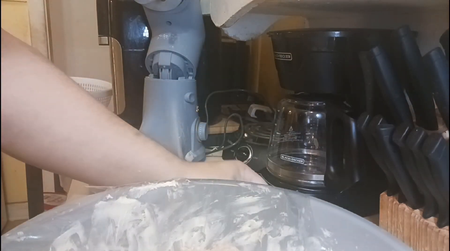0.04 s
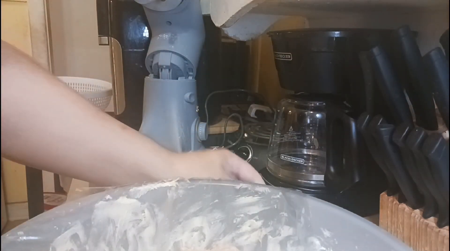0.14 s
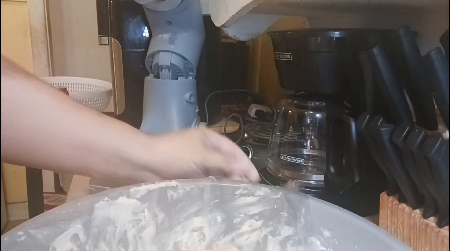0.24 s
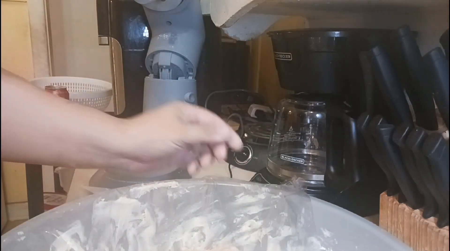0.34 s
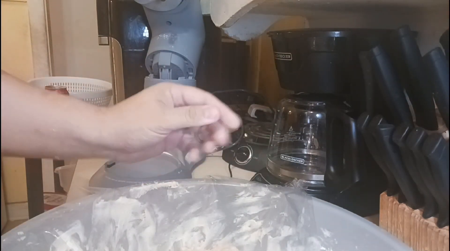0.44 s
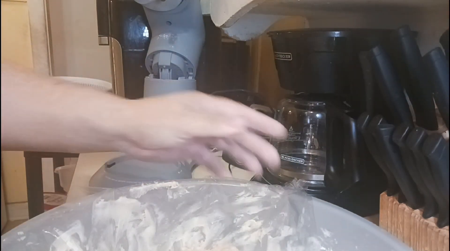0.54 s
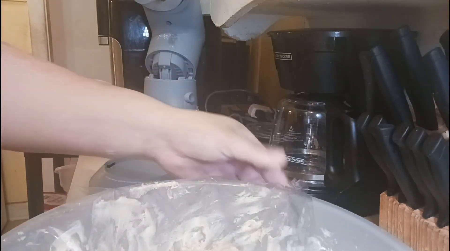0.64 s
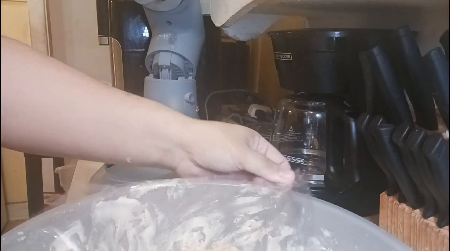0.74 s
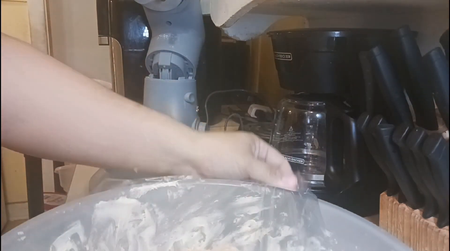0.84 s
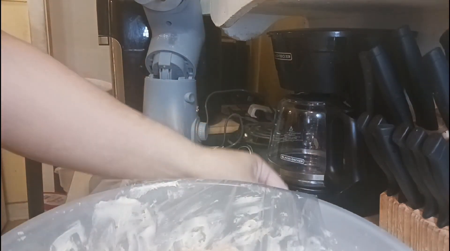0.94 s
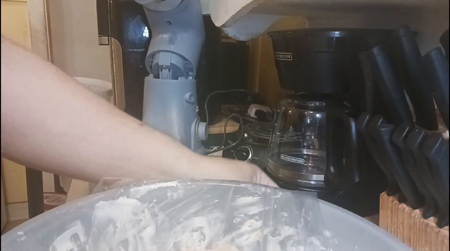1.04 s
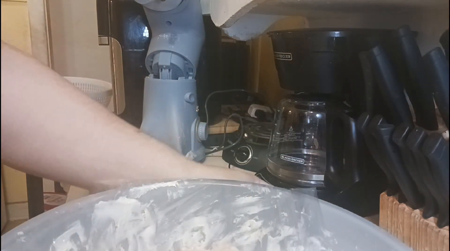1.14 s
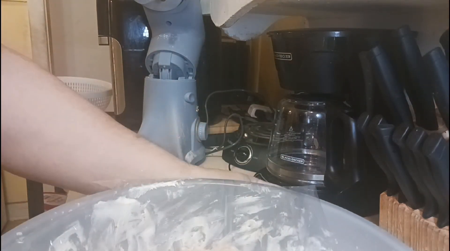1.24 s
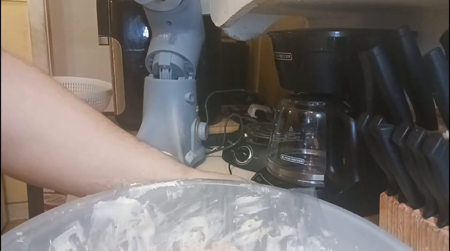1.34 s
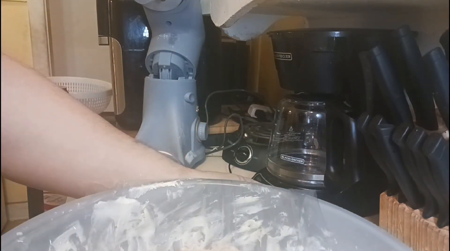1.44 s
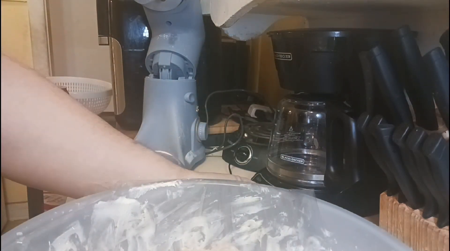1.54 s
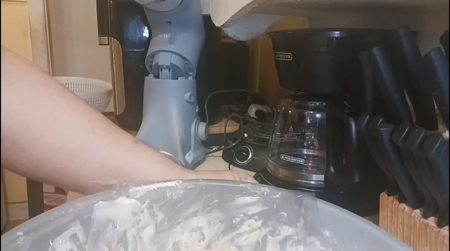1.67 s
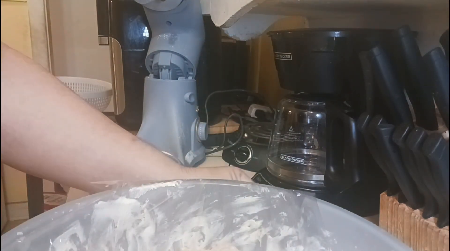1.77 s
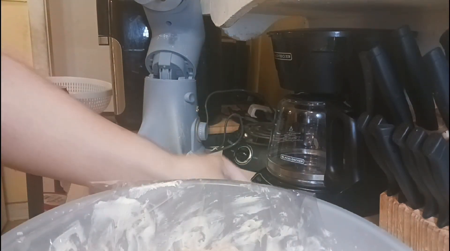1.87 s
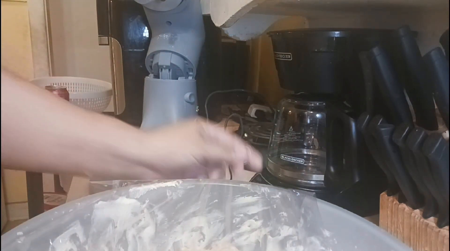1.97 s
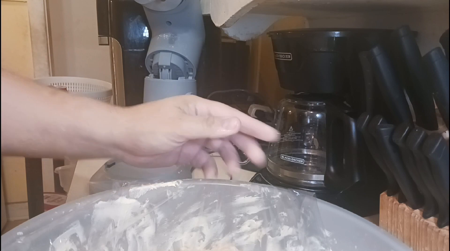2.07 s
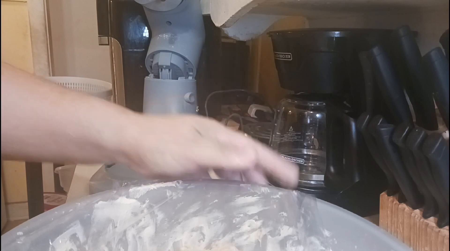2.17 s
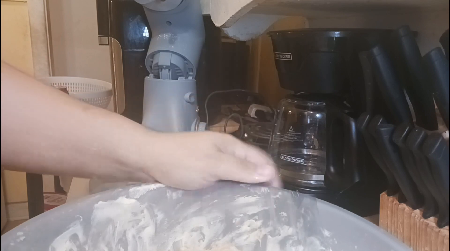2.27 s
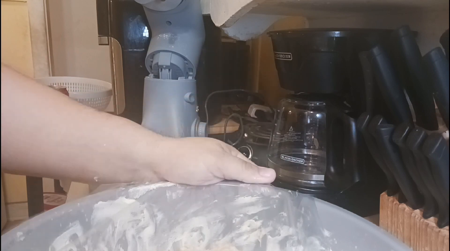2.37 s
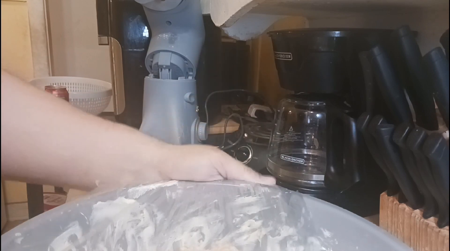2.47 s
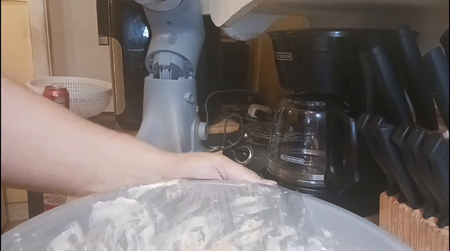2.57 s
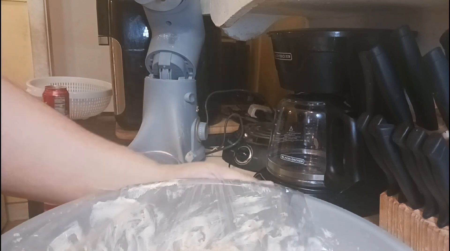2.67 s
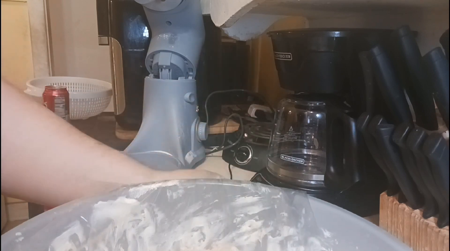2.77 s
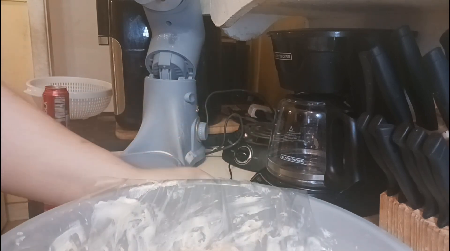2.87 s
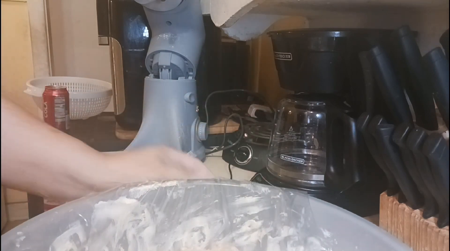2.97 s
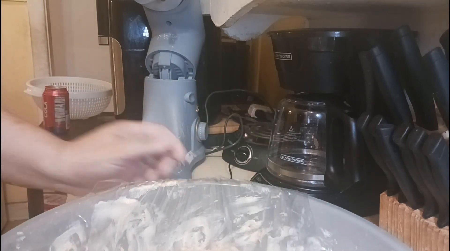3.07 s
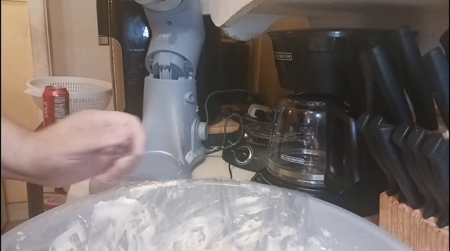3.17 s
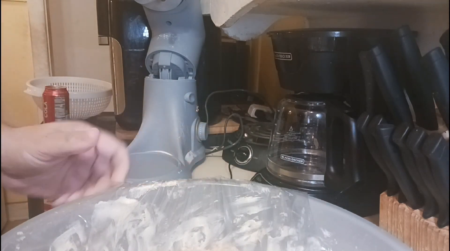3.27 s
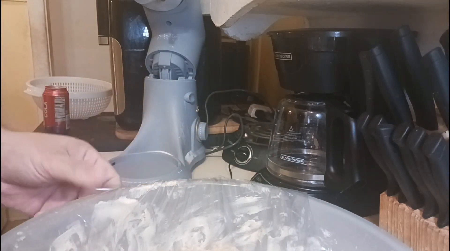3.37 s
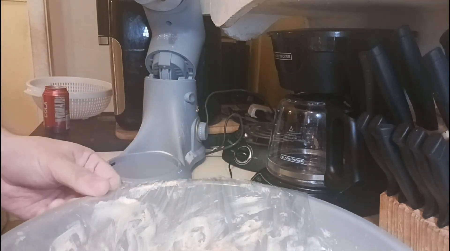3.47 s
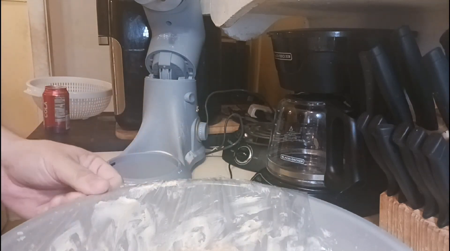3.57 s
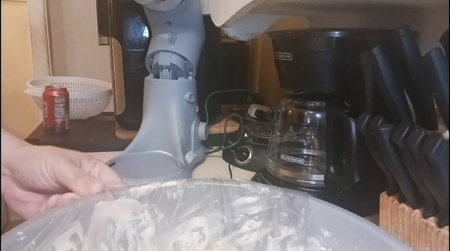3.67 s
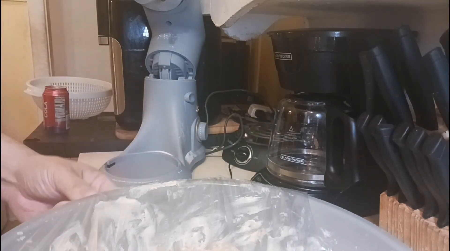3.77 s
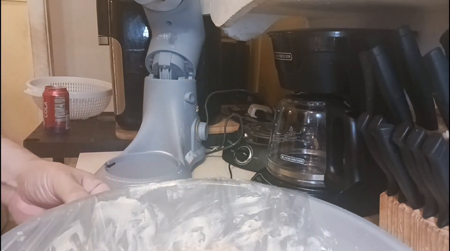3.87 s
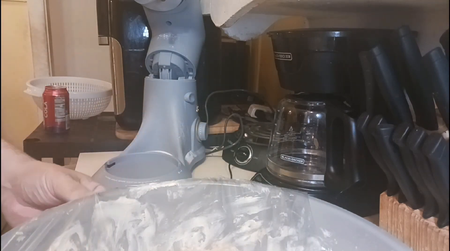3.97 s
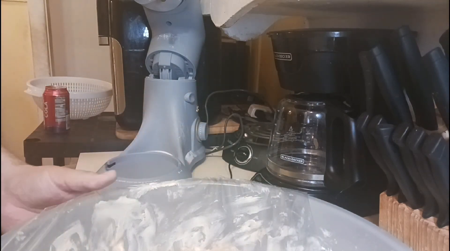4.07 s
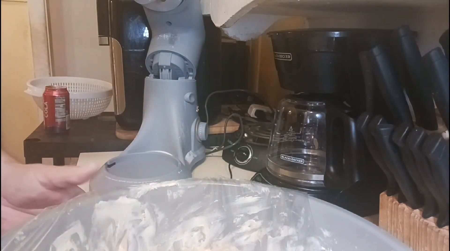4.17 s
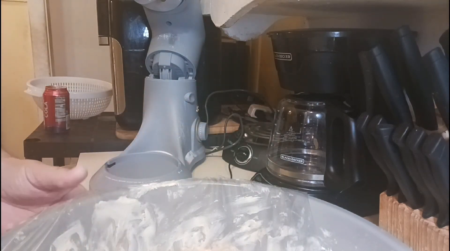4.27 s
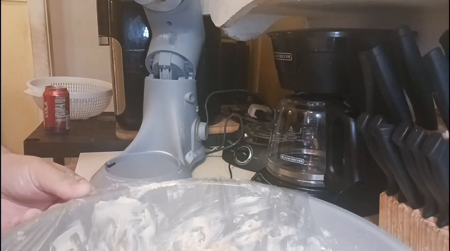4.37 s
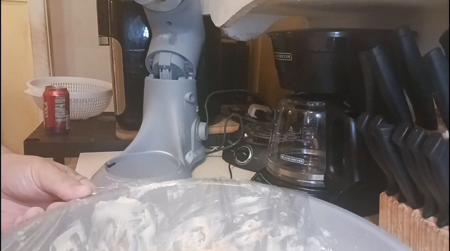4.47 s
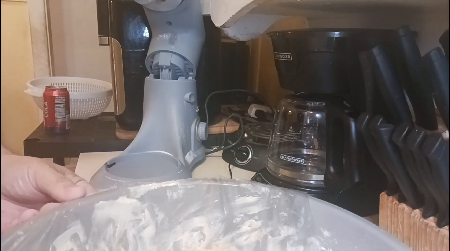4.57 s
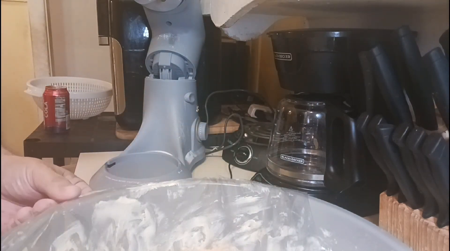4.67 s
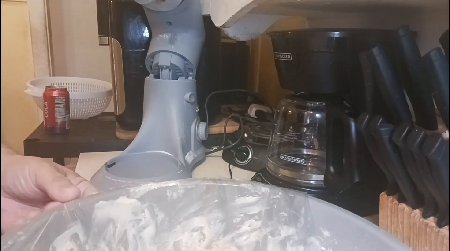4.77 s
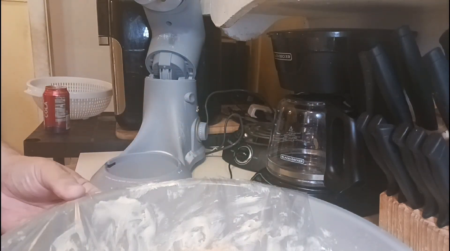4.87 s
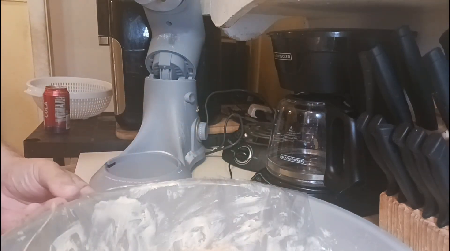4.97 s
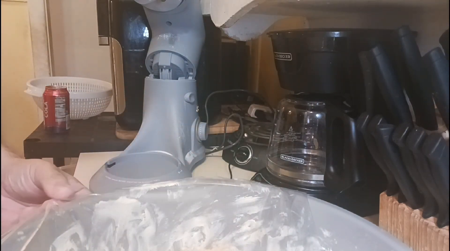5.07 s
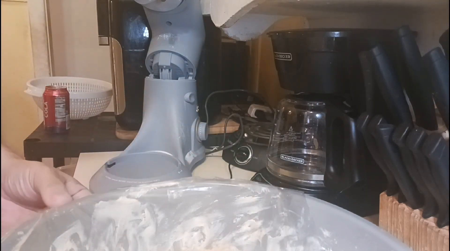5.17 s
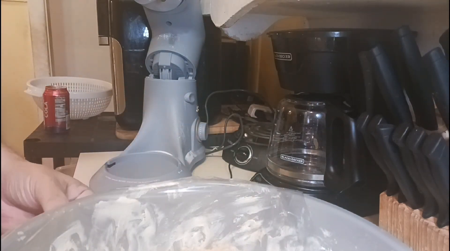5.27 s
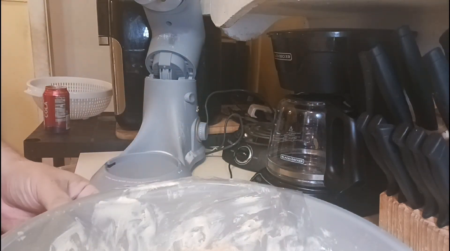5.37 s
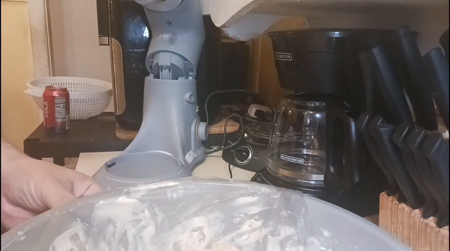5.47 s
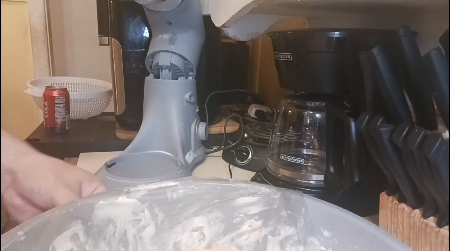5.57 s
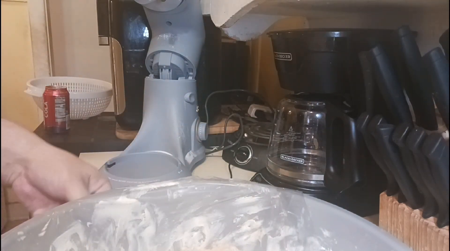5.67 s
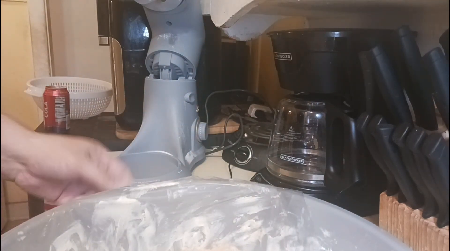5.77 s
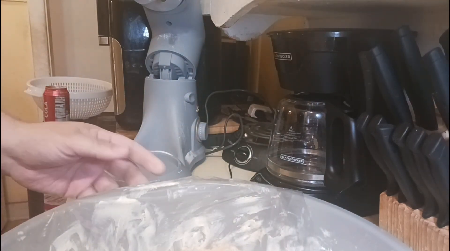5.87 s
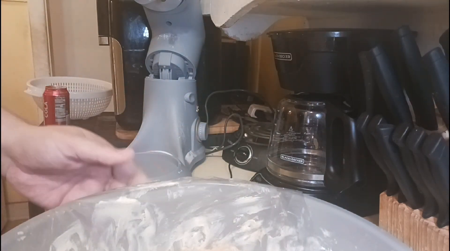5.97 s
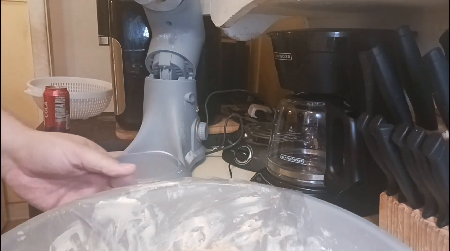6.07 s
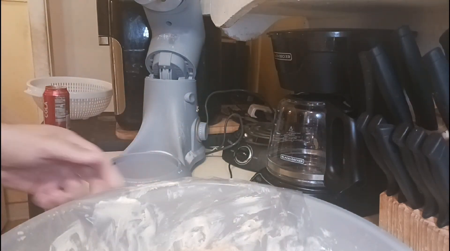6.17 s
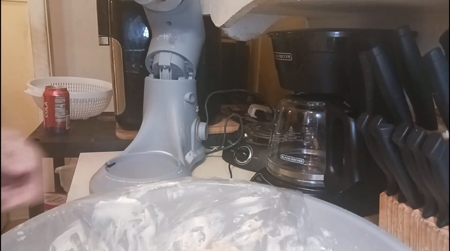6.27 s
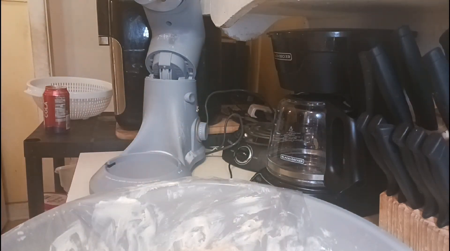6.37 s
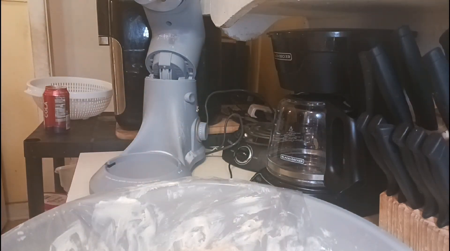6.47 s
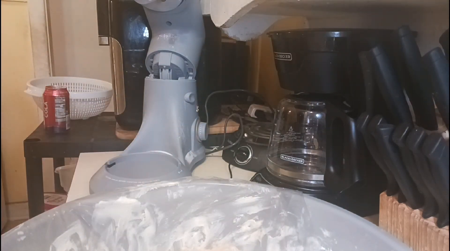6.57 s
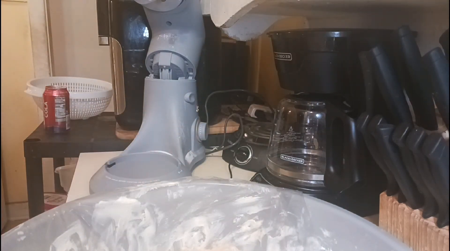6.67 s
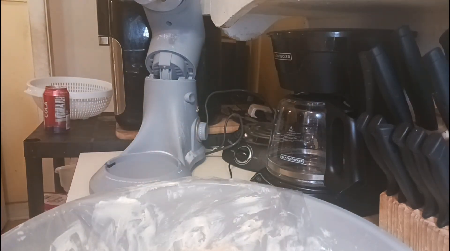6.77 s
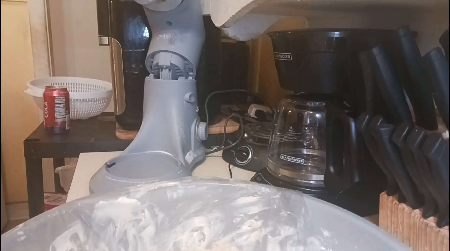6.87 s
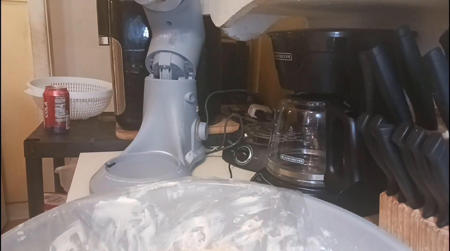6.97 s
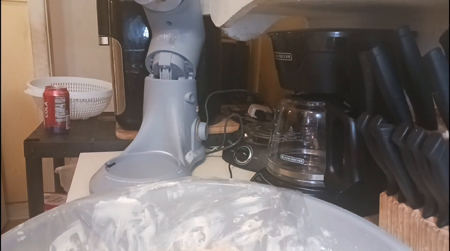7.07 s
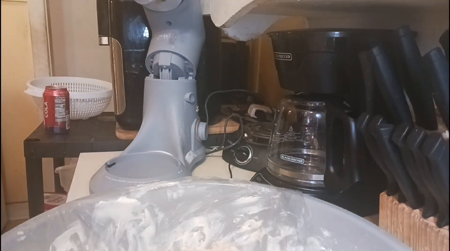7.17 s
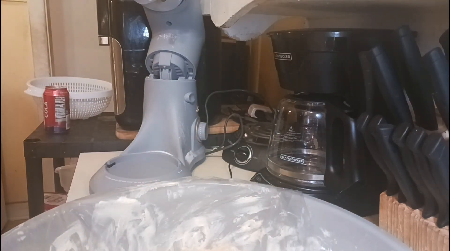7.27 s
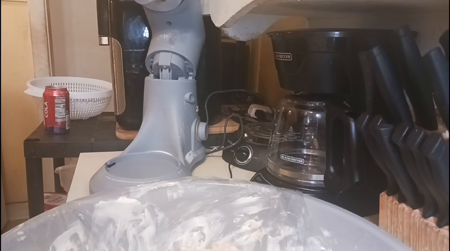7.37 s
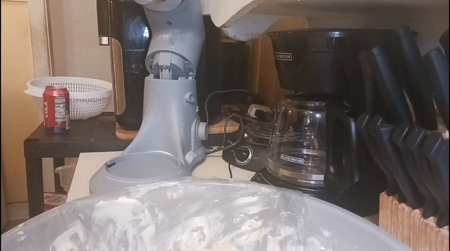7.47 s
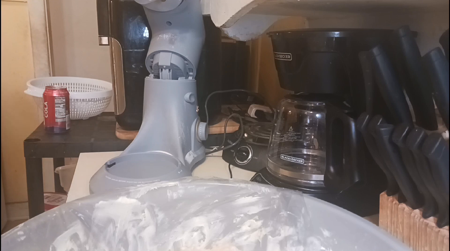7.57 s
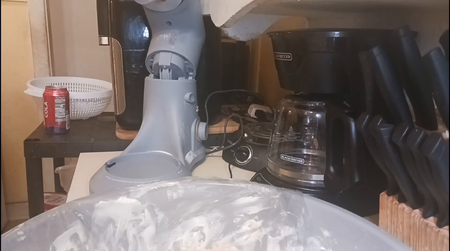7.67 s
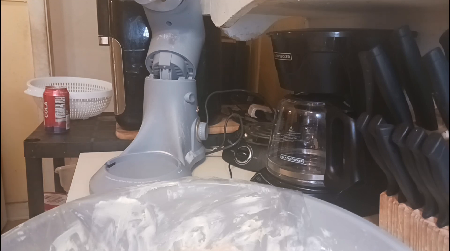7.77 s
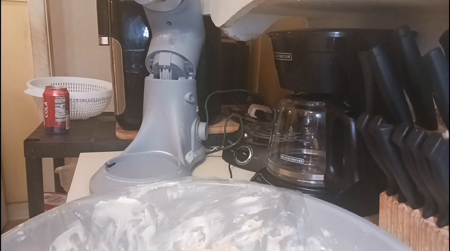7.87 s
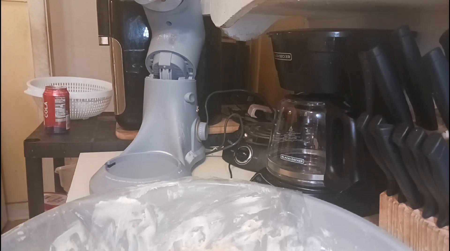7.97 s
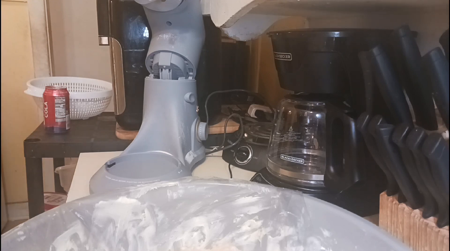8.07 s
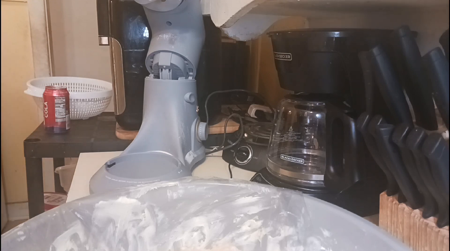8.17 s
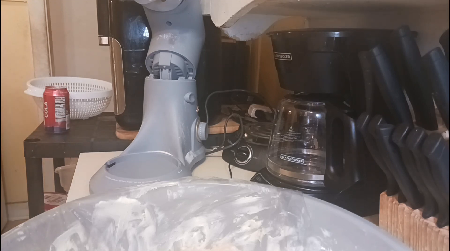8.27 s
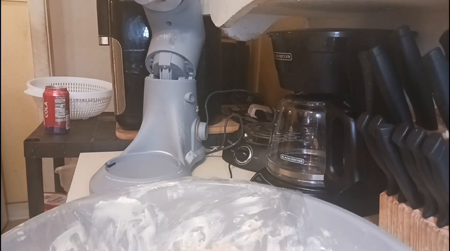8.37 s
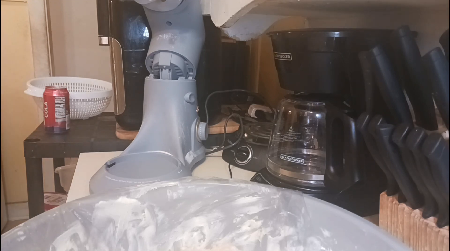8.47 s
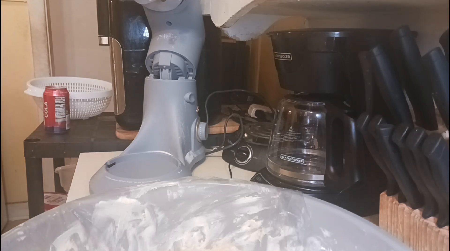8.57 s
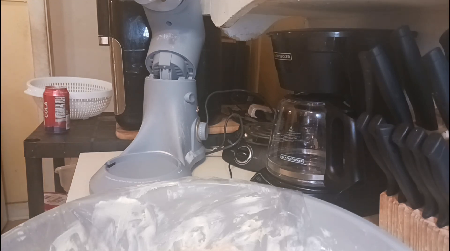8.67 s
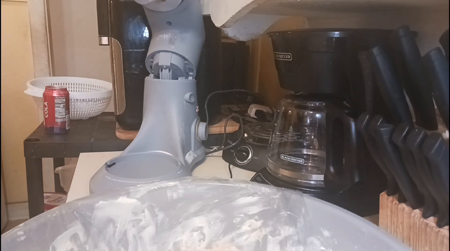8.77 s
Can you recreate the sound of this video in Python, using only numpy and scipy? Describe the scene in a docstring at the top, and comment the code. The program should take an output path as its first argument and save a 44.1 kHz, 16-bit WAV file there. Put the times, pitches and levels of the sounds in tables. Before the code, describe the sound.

A close stereo phone pickup in a small quiet kitchen, left side bright, right duller, with faint low appliance hum throughout. Plastic film rustles from the start; at 0.1-0.3 s a strong rubbery squeak drops in pitch, with snaps and a woody bump. Light crackle continues, swelling near 1 s. From 1.2 to 1.9 s several short squeaks and creaks slide up and down, with a knock at 1.3. After a brief lull, 2.3-3.1 s is dense: crisp crackles, chirps, snaps and bumps, loudest around 2.9. Then sparse ticks, a sharp crinkle at 3.55, tiny chirps at 4.1 and 4.95, creaky snaps near 5.45, a bright crackle and squeak at 5.7, and a last rising squeak at 6.2. From 6.3 to 8 s only faint rustles and soft bumps remain. Crackling returns at 8-8.3 s, ending in tight higher-pitched snaps and knocks at 8.6-8.8.

```python
"""Fingers press and stretch cling film over the rim of a mixing bowl in a quiet kitchen, close to a phone.
Appliances hum far off throughout (shaped noise) while the film rustles and creaks (clicks, short grains).
Squeaky strokes (a push per slip of the skin) start at once and recur until 6.2 s; from 0.24 s the bowl
bumps the counter (noise bursts) and folds snap (crackle over a ringing push), densely again after 8 s.
The left microphone port is bright, the right one dull."""
import sys
import numpy as np
from scipy import signal
from scipy.fft import rfft, irfft, next_fast_len
from scipy.io import wavfile
from scipy.ndimage import uniform_filter1d, map_coordinates

SR = 44100
rng = np.random.default_rng(int(sys.argv[2]) if len(sys.argv) > 2 else 0)


def generate_wav(signal):
    """Clip the signal to [-1, 1] and save it as 16-bit WAV at the path in sys.argv[1]."""
    frames = np.transpose(np.atleast_2d(signal))
    scaled = np.clip(frames, -1, 1) * 32767
    pcm = np.round(scaled).astype(np.int16)
    wavfile.write(sys.argv[1], SR, pcm)


N = 389403

# Spectra of fine and coarse crackle, relative: freq_hz, density_db_per_hz
FINE_SPECTRUM = [(5000, -21), (8000, -20.5), (9500, -16), (12200, -3), (14900, -11.5), (16500, -28)]
COARSE_SPECTRUM = [(200, -28.5), (500, -8), (1500, 7), (3000, 5.5), (5000, 1.5), (8500, -18), (12000, -17)]
# Pitch of creaks and snaps, higher on tighter film: time_s, pitch_hz
FILM_PITCH = [(0, 761.5), (1.1, 584), (2.3, 937), (2.7, 567), (3.1, 721), (3.55, 874), (6, 793), (7, 1130),
              (8.2, 1320), (8.6, 1397)]
# Steady stick-slip strokes, a list of points each: time_s, slips_per_s, relative_level_db
STROKES = [
    [(.09, 970, -60), (.105, 910, -29.5), (.125, 950, -40)],
    [(.13, 649, -39), (.157, 692.3, -15), (.168, 693, -12), (.18, 705, -12), (.2, 708, -10),
     (.208, 686, -27.5)],
    [(.195, 250, -23.5), (.21, 248.4, -17), (.24, 236.3, -13.5), (.254, 218.8, -27)],
    [(1.235, 333.1, -32.5), (1.27, 505.4, -27.5), (1.292, 658.7, -15.5), (1.31, 599.5, -23.5),
     (1.33, 425.2, -15), (1.36, 294.6, -20), (1.39, 232.6, -21.5), (1.43, 178.3, -33.5)],
    [(1.52, 375.7, -41.5), (1.545, 460.7, -21), (1.562, 481.7, -19), (1.59, 330.8, -33), (1.62, 244.1, -34),
     (1.64, 339.3, -24), (1.665, 423.7, -25), (1.7, 318.4, -50)],
    [(1.82, 140, -46), (1.828, 260.2, -25), (1.838, 337, -23), (1.852, 501, -20), (1.868, 735, -22.5),
     (1.885, 783.5, -24.5), (1.91, 800, -44.5)],
    [(2.345, 537, -29), (2.37, 864, -22), (2.392, 918, -35.5)],
    [(2.665, 506, -32), (2.68, 468, -26), (2.72, 543, -35.5), (2.73, 508.5, -45)],
    [(2.85, 499, -23), (2.862, 484.4, -13.5), (2.872, 491.5, -14.5), (2.897, 505.4, -19), (2.922, 446, -28)],
    [(4.14, 860, -37.5), (4.146, 838, -31), (4.156, 830, -48)],
    [(4.952, 682, -40), (4.972, 978, -30), (5, 1017, -51)],
    [(5.71, 744, -47.5), (5.74, 905, -19), (5.76, 982, -46.5)],
    [(6.165, 410, -30.5), (6.18, 488.8, -19.5), (6.195, 593.3, -43), (6.21, 814, -19)],
]


def amp(db):
    """Amplitude factor of a level in dB."""
    return 10 ** (np.asarray(db) / 20)


def unit(x):
    """Scale to an RMS of 1."""
    return x / np.sqrt(np.mean(x ** 2) + 1e-20)


def along(points, hz):
    """Interpolate (Hz, value) points on a log frequency axis."""
    f, v = np.transpose(points)
    return np.interp(np.log(hz + 1), np.log(f + 1), v)


def curves(rows, t):
    """Each column after the time, interpolated at the times t."""
    s, *cols = np.transpose(rows)
    return [np.interp(t, s, c) for c in cols]


def wobble(rate):
    """A smooth random curve with rate knots a second."""
    knots = rng.standard_normal(int(N * rate / SR) + 4)
    return map_coordinates(knots, [np.arange(N) * rate / SR])


def filtered(x, response):
    """Multiply the spectrum of x by a response of frequency."""
    m = next_fast_len(N + SR // 2)
    return irfft(rfft(x, m) * response(np.fft.rfftfreq(m, 1 / SR)), m)[..., :N]


def coloured(x, spectrum):
    """Filter x by (Hz, dB) points."""
    return filtered(x, lambda hz: amp(along(spectrum, hz)))


def hum():
    """Far appliances and the microphones' own hiss: noise less alike in the ports as pitch rises, drifting."""
    # freq_hz, relative_density_db_per_hz
    kitchen = [(22, -42), (43, -8.5), (62, -2.5), (110, -7.5), (170, -26), (250, -24), (330, -15),
               (420, -32), (2050, -42.5), (8360, -48), (13200, -33.5), (16000, -42)]
    # Left-right likeness: freq_hz, correlation
    likeness = [(60, 0.86), (300, 0.61), (700, 0.35), (1400, 0.09)]

    def mid_side(hz):
        angle = np.arccos(np.clip(along(likeness, hz), -1, 1)) / 2
        return amp(along(kitchen, hz)) * [np.cos(angle), np.sin(angle)]

    mid, side = filtered(rng.standard_normal((2, N)), mid_side)
    drift_db = 1.5 * wobble(1.7)
    return amp(-59.5 + drift_db) * unit(np.array([mid + side, mid - side]))


def hands(t):
    """Levels in dB of fine crackle, coarse crackle and creak: pulls build up, hold and fade over the rustle."""
    # Presses and pulls: peak_s, build_s, hold_s, fine_db, coarse_db, creak_db
    pulls = [(0.028, 0.042, 0.15, -46, -50.5, -56.5), (0.203, 0.054, 0.025, -29.5, -30.5, -17.5),
             (0.27, 0.051, 0.0042, -44, -38.5, -31), (0.322, .012, 0.0027, -45, -46, -32.5),
             (0.998, 0.16, .005, -33.5, -36, -42.5), (1.064, 0.052, 0.016, -45, -41, -30),
             (1.321, .12, 0.028, -34, -27, -36.5), (1.544, 0.0052, 0.044, -48.5, -37, -23),
             (1.612, 0.028, 0.04, -46.5, -33, -19.5), (1.728, 0.024, 0.038, -49, -41, -38),
             (1.829, 0.01, 0.045, -41.5, -46, -28), (2.324, 0.013, .055, -38, -37.5, -29.5),
             (2.454, 0.033, 0.054, -42, -42, -43.5), (2.588, 0.071, 0.016, -44, -61.5, -40.5),
             (2.676, 0.14, 0.06, -36.5, -39, -37.5), (2.782, 0.021, 0.061, -33.5, -32.5, -29.5),
             (2.918, 0.006, 0.017, -27, -30, -21.5), (3.091, 0.1464, 0.0036, -36.5, -48.5, -49.5),
             (3.524, 0.012, .03, -43.5, -81, -55), (3.562, 0.017, 0.0019, -27.5, -34.5, -37),
             (3.769, 0.0095, 0.0071, -50.5, -46, -60), (3.87, .005, 0.0058, -61, -45, -52.5),
             (3.979, 0.031, 0.011, -44, -53, -45), (4.145, 0.041, 0.0045, -40.5, -47, -50),
             (4.825, 0.014, 0.064, -47.5, -52.5, -47), (4.955, 0.11, .005, -48.5, -45, -39),
             (5.076, .01, .03, -52.5, -48, -43), (5.425, 0.0072, 0.052, -42, -49.5, -30),
             (5.591, 0.073, 0.015, -46.5, -44, -41.5), (5.67, 0.0083, .005, -43, -39, -32),
             (5.723, 0.049, 0.042, -24, -37, -34.5), (6.1, 0.021, .03, -40, -49, -76),
             (6.15, 0.039, 0.015, -33, -47, -35.5), (6.191, 0.053, 0.009, -27, -45, -39.5),
             (6.805, .006, 0.016, -65.5, -53.5, -43), (6.878, 0.064, .005, -55, -46.5, -48.5),
             (7.18, 0.31, 0.02, -51.5, -53.5, -49), (7.248, 0.042, 0.026, -57.5, -46.5, -44),
             (7.676, 0.11, 0.0083, -65, -56.5, -52), (8.009, 0.21, 0.0045, -47, -56, -76),
             (8.117, 0.065, 0.006, -37, -64.5, -71.5), (8.191, 0.025, 0.015, -32.5, -41, -41.5),
             (8.437, .015, 0.032, -44, -74, -58), (8.611, 0.012, 0.0065, -36.5, -39, -34.5),
             (8.65, 0.013, 0.0092, -33, -34.5, -36.5), (8.709, 0.0059, 0.012, -27.5, -28.5, -29.5),
             (8.773, 0.005, 0.0047, -29, -30, -49.5)]
    # Loose film between the pulls: time_s, rustle_db (ahead of the layer offsets)
    rustle = [(0, -44), (.6, -59.5), (1.2, -54), (1.8, -49), (2.03, -63), (2.29, -117), (2.4, -44),
              (3.25, -55.5), (3.45, -74), (3.62, -58.5), (4.1, -53.5), (4.31, -90), (4.7, -51),
              (5.34, -56.5), (5.65, -49), (5.92, -83), (6.07, -96), (6.3, -66.5), (6.47, -76.5),
              (7.1, -61.5), (7.47, -76.5), (7.82, -63.5), (8.3, -59), (8.83, -56)]
    # Layer offsets from that curve: fine_db, coarse_db, creak_db
    rustle_offsets_db = [1, -9, -28.5]
    # Decay once a pull lets go: fine_db_per_s, coarse_db_per_s, creak_db_per_s
    fade_db_per_s = [304.5, 360.5, 377]
    build_db = 30  # climb during the build-up

    grid = np.arange(0, N / SR, .001)
    power = amp(2 * (curves(rustle, grid)[0] + np.array(rustle_offsets_db)[:, None]))
    for peak_s, build_s, hold_s, *peak_db in pulls:
        before_s = np.maximum(peak_s - grid, 0)
        after_s = np.maximum(grid - peak_s - hold_s, 0)
        fall_db = build_db * before_s / build_s + np.outer(fade_db_per_s, after_s)
        power = power + amp(2 * (np.array(peak_db)[:, None] - fall_db))
    return [np.interp(t, grid, db) for db in 10 * np.log10(power)]


def crackle(spread_db, clump_db):
    """Tiny folds let go in clumps that start at once and thin out: clicks of random sign and uneven size."""
    clump_s, clumps_per_s = .004, 90  # clump_s: decay to 1/e
    starts = (rng.random(N) < clumps_per_s / SR) * amp(clump_db * rng.standard_normal(N))
    clumps = 0.5 + signal.lfilter([1], [1, -np.exp(-1 / (clump_s * SR))], starts)
    size_db = spread_db * rng.exponential(size=N) + 0.53 * wobble(170)
    return clumps * amp(size_db) * rng.standard_normal(N)


def folds():
    """Fine and coarse crackle of the folds, partly sharing their clicks, follow the hands."""
    fine_db, coarse_db, _ = hands(np.arange(N) / SR)
    shared = crackle(spread_db=3, clump_db=2)
    mixed = unit(shared) + unit(crackle(spread_db=-3.5, clump_db=-6.5))
    fine = amp(fine_db) * unit(coloured(shared, FINE_SPECTRUM))
    coarse = amp(coarse_db) * unit(coloured(mixed, COARSE_SPECTRUM))
    return fine + coarse


def creak(count=7000, size=600):
    """Uneven slips: each a few cycles near the pitch of the film's tension, weaker during steady strokes."""
    draw, scatter = rng.random((count, 3)), rng.standard_normal((count, 2))
    s = draw[:, 0] * N / SR
    sign = np.sign(draw[:, 1] - .5)
    upper = draw[:, 2] < .3  # some slips ring the next mode, near twice the pitch
    hz = curves(FILM_PITCH, s)[0] * np.exp(.2 * scatter[:, 0]) * (1 + 1.1 * upper)
    steady = sum((s > stroke[0][0]) & (s < stroke[-1][0]) for stroke in STROKES) > 0
    level_db = hands(s)[2] - 8.0 * steady - 11 * upper + 4.17 * scatter[:, 1]
    gain = amp(level_db) * np.sqrt(hz / 800) * sign

    cycles = hz[:, None] * np.arange(size) / SR
    grains = np.sin(2 * np.pi * cycles) * np.exp(-cycles / 3.4) * (1 - np.exp(-cycles / .4))
    where = (s * SR).astype(int)[:, None] + np.arange(size)
    return np.bincount(where.ravel(), (gain[:, None] * grains).ravel(), N + size)[:N]


def taut(pushes):
    """Pushes ring the broad resonances of the stretched film; soft skin keeps the treble down."""
    # Film resonances: centre_hz, width_hz, level_db
    resonances = [(620, 520, 0), (1600, 1000, -6), (3200, 1200, -21)]

    def response(f):
        total = 0
        for k, (centre_hz, width_hz, db) in enumerate(resonances):
            damping = 1j * f * width_hz
            total = total + (-1) ** k * amp(db) * damping / (centre_hz * centre_hz - f * f + damping)
        return total / (1 + 1j * f / 4000)

    return filtered(pushes, response)


def squeaks():
    """Stick-slip: one push at each slip of the skin; slow slips come less evenly in time and size."""
    # Slip scatter of each stroke at 500 slips a second: share_of_spacing
    unevenness = [.02, .01, .018, .025, .05, .012, .04, .08, .045, .03, .03, .04, .04]
    pushes, taps = np.zeros(N), np.arange(-8, 8)
    for stroke, uneven in zip(STROKES, unevenness):
        at = np.arange(round(stroke[0][0] * SR), round(stroke[-1][0] * SR))
        hz, db = curves(stroke, at / SR)
        turns = np.cumsum(hz) / SR
        slip = np.interp(np.arange(int(turns[-1]) + 1), turns, np.arange(len(at)))
        chance = rng.standard_normal((400, 2))[:len(slip)]
        i = slip.astype(int)
        rough = uneven * np.sqrt(500 / hz[i])
        slip = slip + rough * chance[:, 0] * SR / hz[i]
        gain = amp(db[i] + 30 + 35 * rough * chance[:, 1]) * np.sqrt(500 / hz[i])

        # windowed sinc: pulses placed between samples
        where = np.floor(slip).astype(int)[:, None] + taps
        off = where - slip[:, None]
        pulses = gain[:, None] * np.sinc(off) * np.cos(np.pi * off / 17) ** 2
        pushes += np.bincount((where + at[0]).ravel(), pulses.ravel(), N)
    return taut(pushes)


def shifting():
    """Bowl and wrists bump the counter: a short woody knock over a soft thud, alike at both ports."""
    # time_s, knock_db, thud_db (ahead of the gains below)
    bumps = [(0.239, -34, -48), (1.341, -36.5, -58.5), (2.405, -64, -47.5), (2.444, -47, -49),
             (2.818, -39.5, -53.5), (2.91, -38.5, -40), (6.176, -71, -49), (6.679, -52.5, -62.5),
             (6.813, -42, -48), (6.871, -58.5, -47), (7.349, -59, -55), (8.646, -45, -53.5),
             (8.711, -35.5, -46.5), (8.774, -39.5, -41.5)]
    knock_t60_s, thud_t60_s, rise_s = 0.28, 0.22, 0.0037
    swell, t = np.zeros((2, N + SR)), np.arange(SR // 3) / SR
    for s, knock_db, thud_db in bumps:
        decay = amp([knock_db + 6.0 - 60 * t / knock_t60_s, thud_db + 6.5 - 60 * t / thud_t60_s])
        swell[:, round(s * SR):][:, :len(t)] += decay * (1 - np.exp(-t / rise_s))
    knock_spectrum = [(70, -34.5), (130, -6.5), (330, 7.5), (600, -11.0), (1500, -37.5)]
    thud_spectrum = [(20, -31.0), (45, -3.5), (110, -3.5), (200, -46.0)]
    knock = unit(coloured(rng.standard_normal(N), knock_spectrum))
    thud = unit(coloured(rng.standard_normal(N), thud_spectrum))
    return swell[0, :N] * knock + swell[1, :N] * thud


def snaps():
    """A fold snaps: a short burst of crackle, and a push that rings the film for a few cycles."""
    # time_s, ring_db, fine_crackle_db
    snap_events = [(0.258, -10, -22), (0.268, -13, -24), (0.28, -11, -23), (0.326, -19, -29),
                   (0.513, -54, -38), (0.612, -60, -44), (0.714, -51, -40), (0.769, -54, -30),
                   (0.811, -56, -32), (0.82, -46, -38), (1.632, -14, -32), (1.82, -15, -35),
                   (2.314, -40, -36), (2.431, -26, -40), (2.442, -40, -26), (2.53, -45, -29),
                   (2.573, -36, -26), (2.587, -38, -17), (2.599, -27, -38), (2.633, -27, -33),
                   (2.72, -28, -26), (2.785, -21, -25), (2.825, -17, -28), (2.898, -9, -22),
                   (2.924, -5, -20), (2.933, -10, -27), (2.996, -24, -41), (3.3, -58, -40),
                   (3.573, -30, -24), (3.777, -45, -43), (3.868, -34, -46), (4.142, -35, -36),
                   (5.356, -56, -41), (5.416, -26, -38), (5.459, -18, -29), (5.477, -18, -35),
                   (5.667, -25, -34), (6.152, -28, -25), (6.808, -34, -50), (6.878, -32, -42),
                   (7.35, -42, -50), (8.012, -52, -33), (8.189, -40, -27), (8.248, -38, -25),
                   (8.442, -45, -24), (8.649, -27, -26), (8.695, -40, -21), (8.709, -22, -18),
                   (8.776, -20, -17)]
    burst_t60_s, burst_rise_s = .013, .0002
    coarse_offset_db = -9  # coarse crackle relative to the ring
    ring_cycles = 1.8  # decay to 1/e
    burst, pushes, t = np.zeros((2, N + SR)), np.zeros(N + SR), np.arange(SR // 8) / SR
    for s, ring_db, fine_db in snap_events:
        start = round(s * SR)
        burst_db = np.array([[fine_db], [ring_db + coarse_offset_db]]) - 60 * t / burst_t60_s
        burst[:, start:][:, :len(t)] += amp(burst_db) * (1 - np.exp(-t / burst_rise_s))
        cycles = curves(FILM_PITCH, s)[0] * t
        ring = np.sin(2 * np.pi * cycles) + .5 * np.sin(2.3 * 2 * np.pi * cycles)
        envelope = np.exp(-cycles / ring_cycles) * (1 - np.exp(-cycles / 0.3))
        pushes[start:][:len(t)] += amp(ring_db) * ring * envelope
    noise = rng.standard_normal(N)
    fine = burst[0, :N] * unit(coloured(noise, FINE_SPECTRUM))
    coarse = burst[1, :N] * unit(coloured(noise, COARSE_SPECTRUM))
    return fine + coarse + pushes[:N]


def walls(x, wait=250):
    """The kitchen's answer, wait samples later: a dying noise that differs from port to port."""
    # freq_hz, t60_s
    room_decay = [(300, 0.25), (800, 0.23), (3000, 0.22), (12000, .15)]
    hz, t, z = signal.stft(rng.standard_normal((2, SR // 2)), SR, nperseg=128)
    decay = amp(-60 * t / along(room_decay, hz)[:, None])
    tail = signal.istft(z * decay, SR, nperseg=128)[1]
    tail = tail / np.linalg.norm(tail[0])
    return signal.fftconvolve(np.pad(x, (wait, 0))[None], tail, axes=1)[:, :N]


def scattered(pair):
    """Sound leaves ever other spots of the film: phase and level at each port wander, most in the treble."""
    # Phase wander, also scaling the level wander: freq_hz, wander_rad
    path_wander = [(200, .1), (700, .2), (1500, .45), (3000, .9), (6000, 1.7)]
    hz, _, z = signal.stft(pair, SR, nperseg=256)
    field = rng.standard_normal((2,) + z.shape)
    field = uniform_filter1d(uniform_filter1d(field, size=14, axis=2), size=8, axis=3)
    turn, patch = unit(field) * along(path_wander, hz)[:, None]
    return signal.istft(z * np.exp(1j * turn) * amp(1.75 * patch), SR, nperseg=256)[1][:, :N]


def scene():
    """Film sounds reach the right port later than the left; room, bumps and hum join them."""
    # time_s, right_port_lag_ms
    port_lag = [(0, .22), (3.2, .22), (3.6, .55), (4.4, .55), (4.6, .28), (7.3, .28), (7.6, .52)]
    film = folds() + creak() + squeaks() + snaps()
    lag_samples = curves(port_lag, np.arange(N) / SR)[0] * SR / 1000
    late = map_coordinates(film, [np.arange(N) - lag_samples])
    direct = amp(0.5) * scattered(np.array([film, late]))
    return direct + amp(-6.0) * walls(film) + shifting() + hum()


def record(dry):
    """The ports share the power unequally; nothing is kept above the band limit."""
    # freq_hz, left_minus_right_db
    port_balance = [(60, 0), (250, -4.5), (500, -2.5), (1000, 2), (4000, 2.5), (6000, 6), (8100, 18),
                    (15000, 13.5)]
    top_hz = 15700

    def response(hz):
        left_power = 1 / (1 + amp(-2 * along(port_balance, hz)))
        return np.sqrt(2 * np.array([left_power, 1 - left_power])) * (hz < top_hz)

    return filtered(dry, response)


dry = scene()
out = record(dry)
generate_wav(out)
```